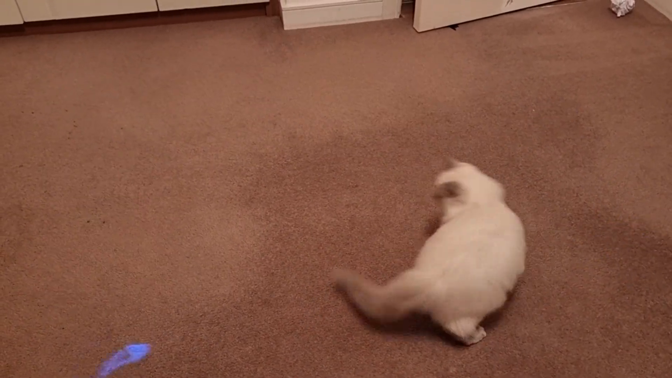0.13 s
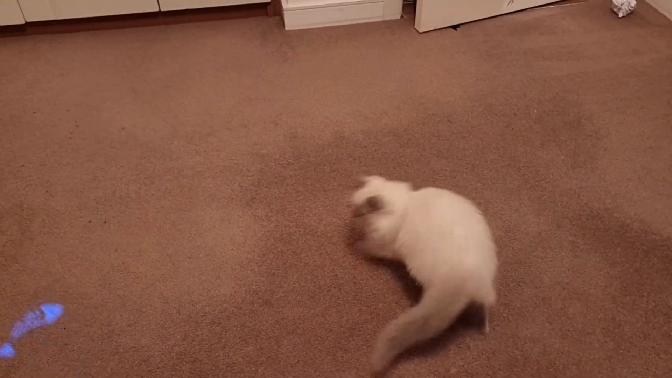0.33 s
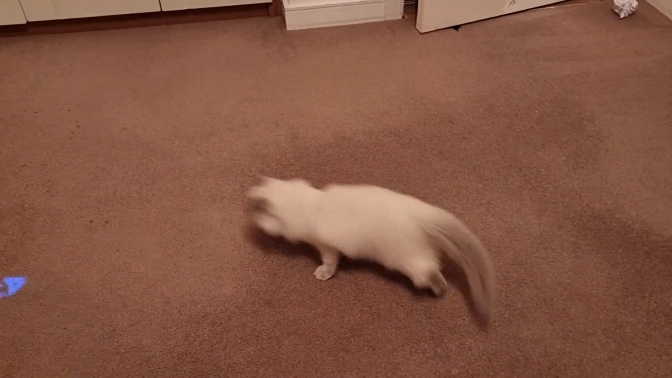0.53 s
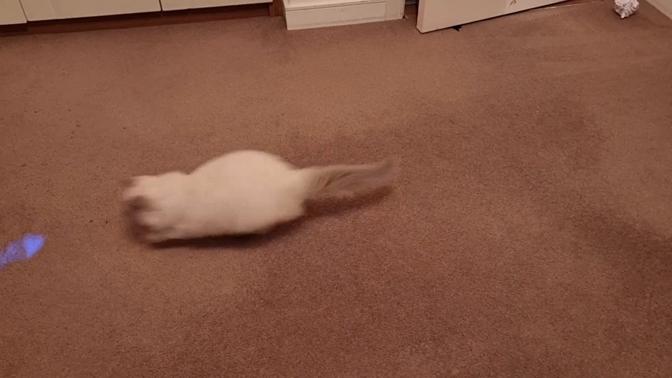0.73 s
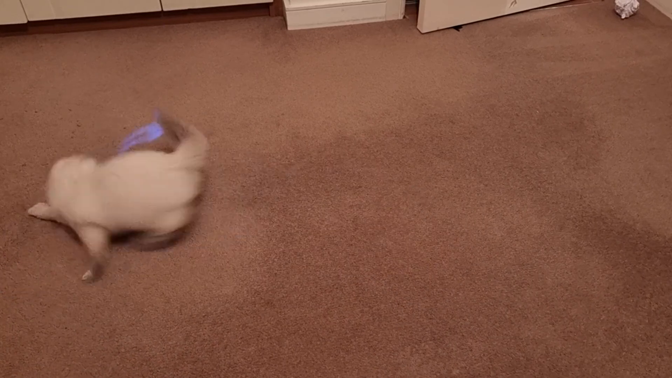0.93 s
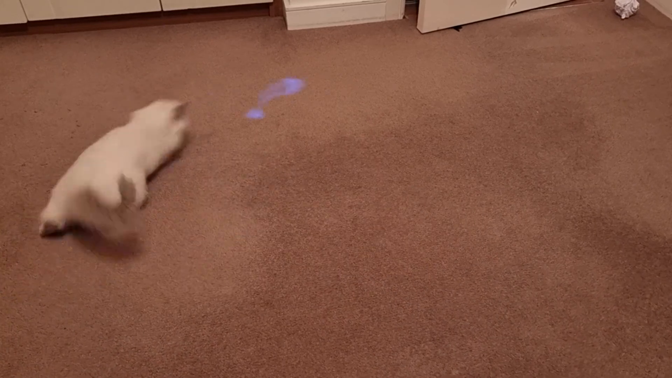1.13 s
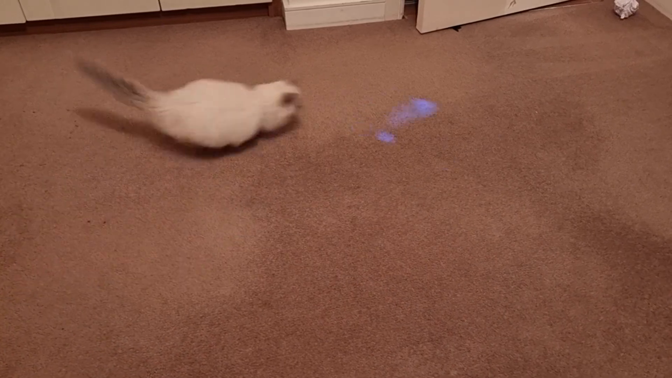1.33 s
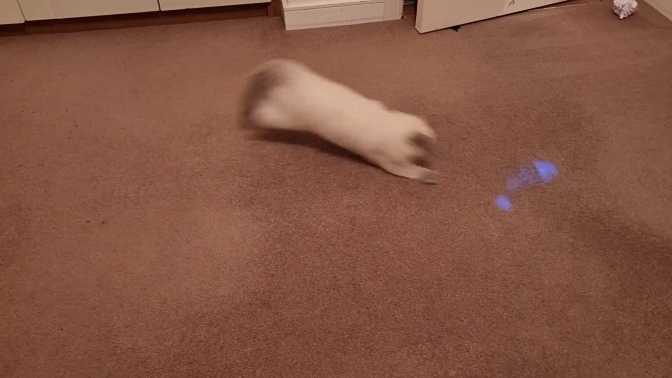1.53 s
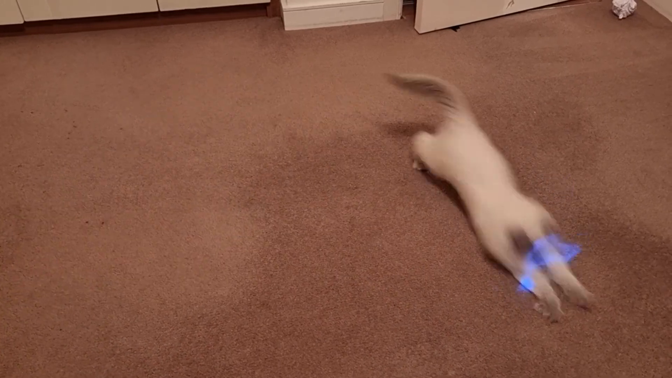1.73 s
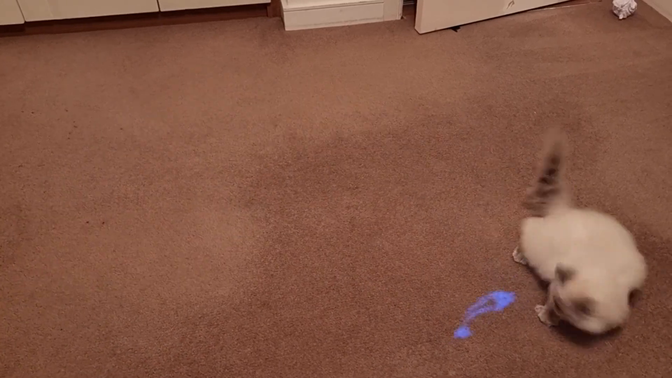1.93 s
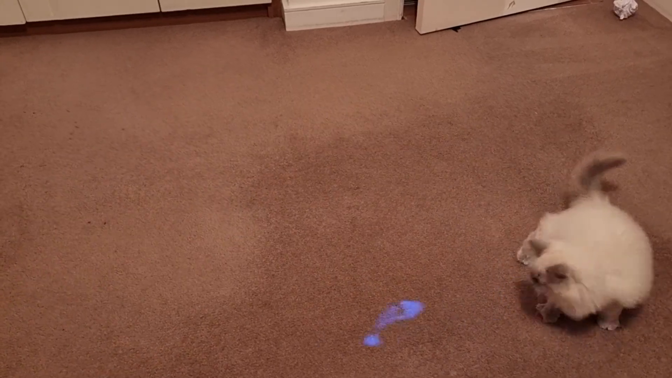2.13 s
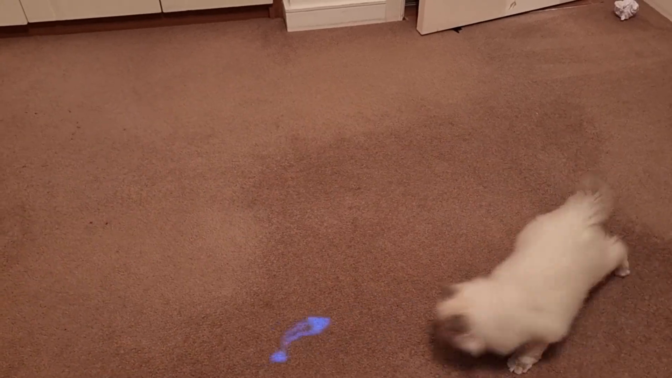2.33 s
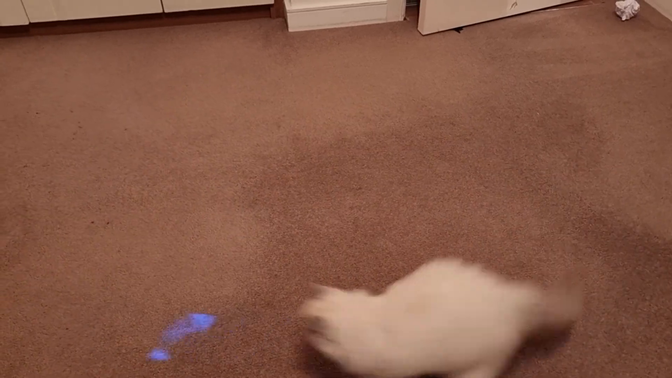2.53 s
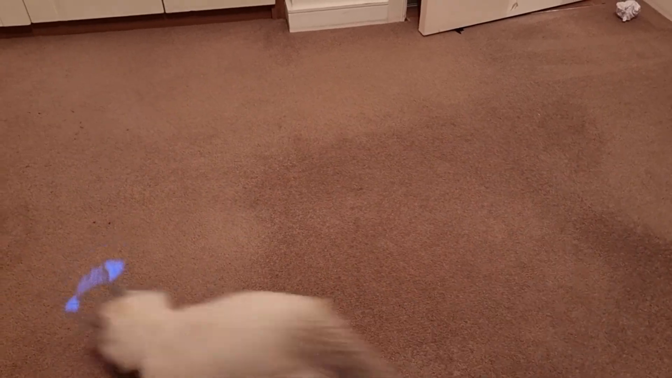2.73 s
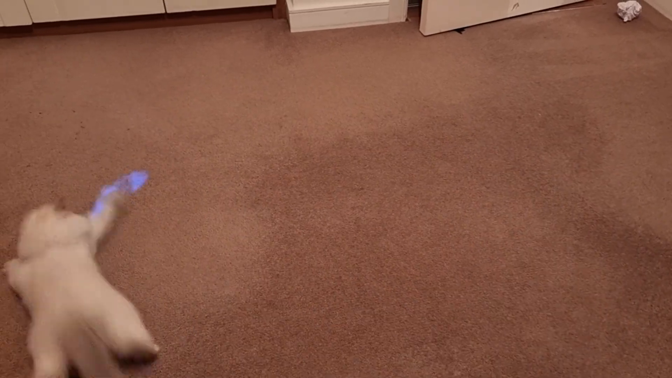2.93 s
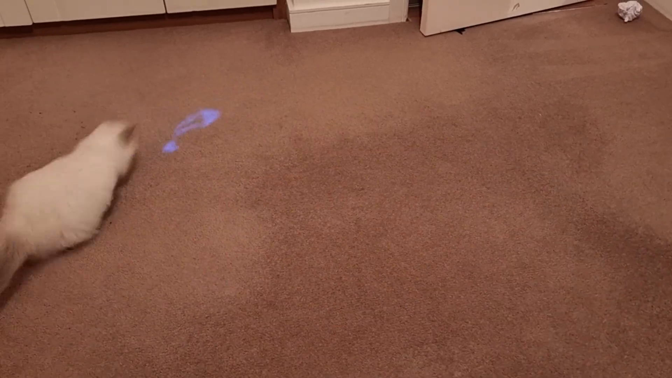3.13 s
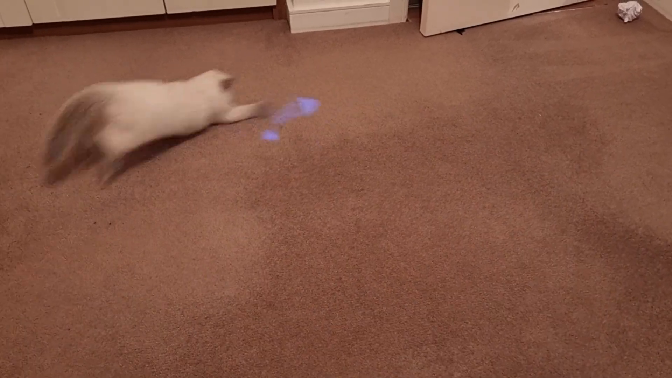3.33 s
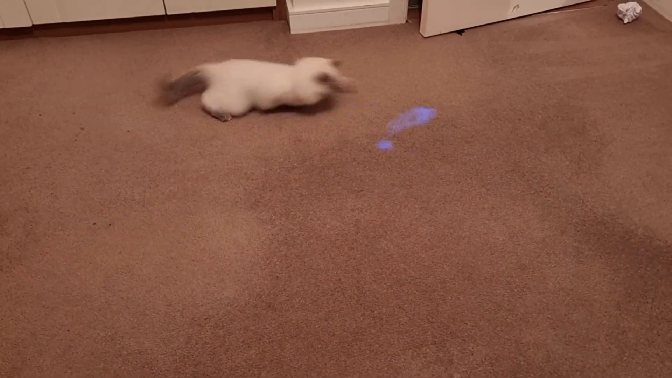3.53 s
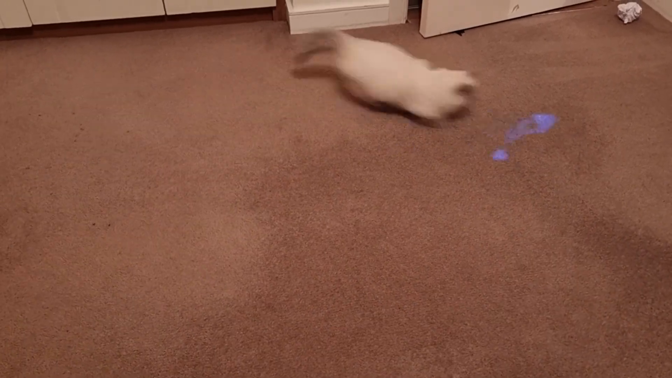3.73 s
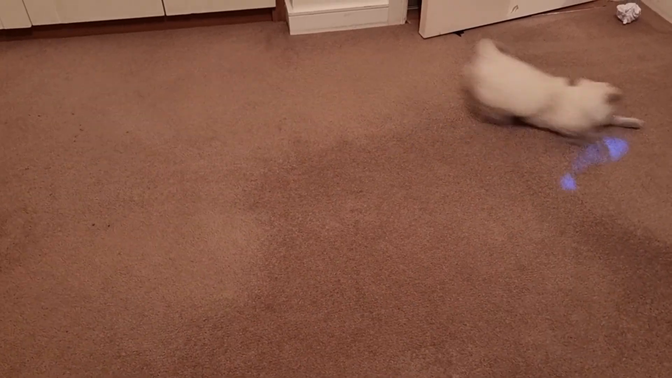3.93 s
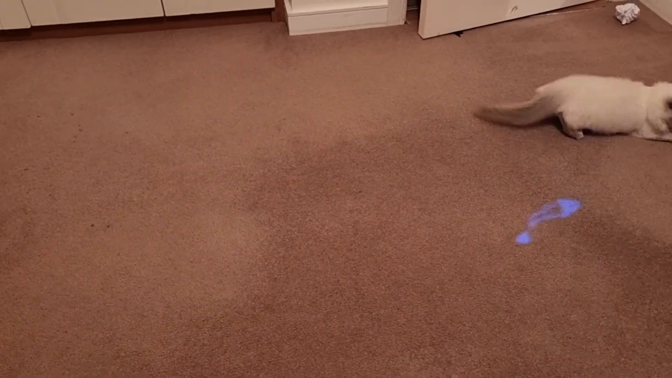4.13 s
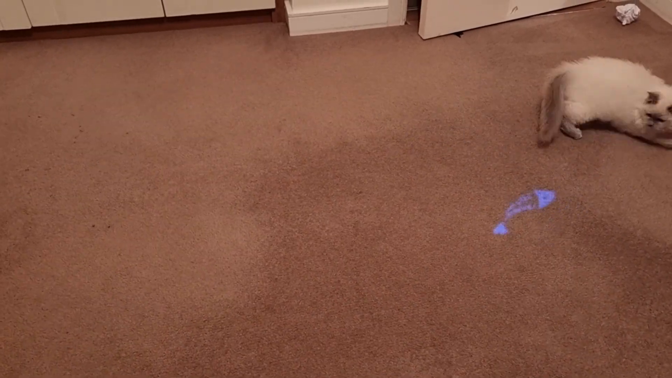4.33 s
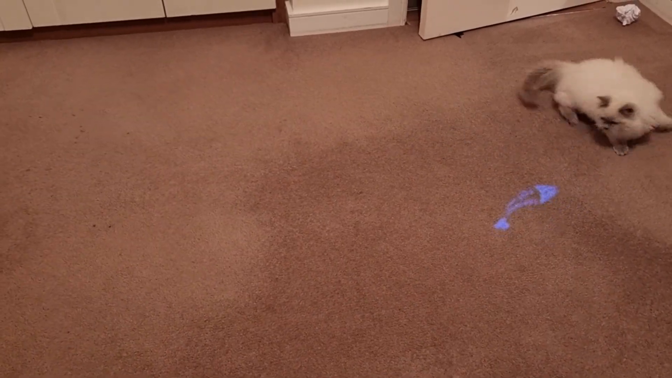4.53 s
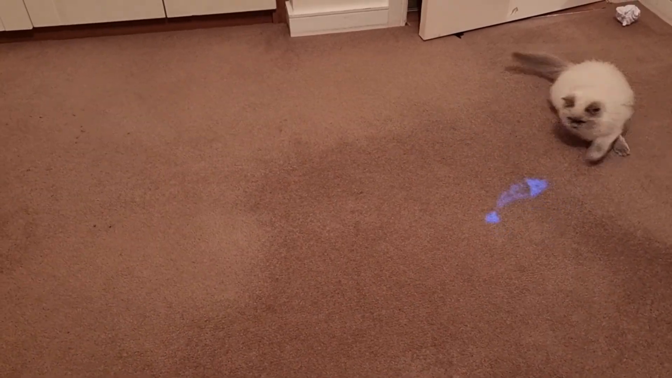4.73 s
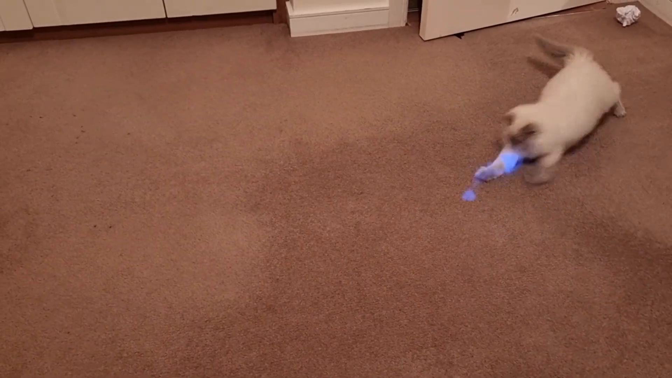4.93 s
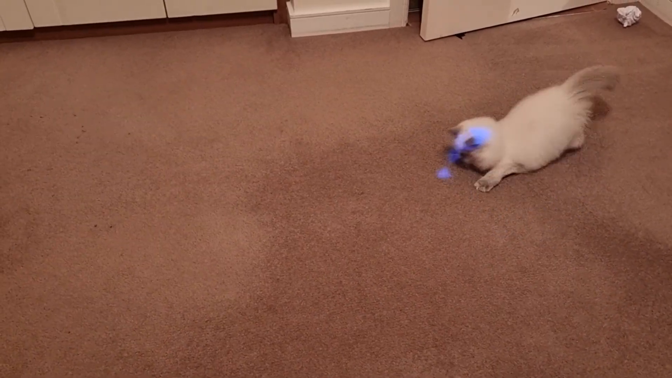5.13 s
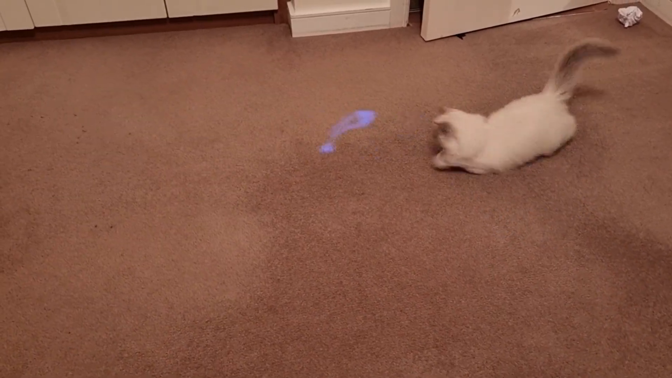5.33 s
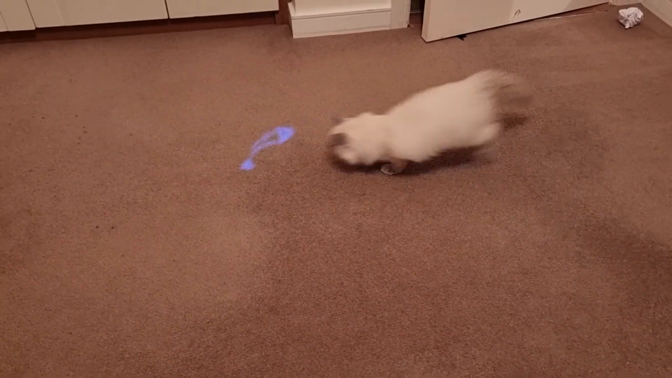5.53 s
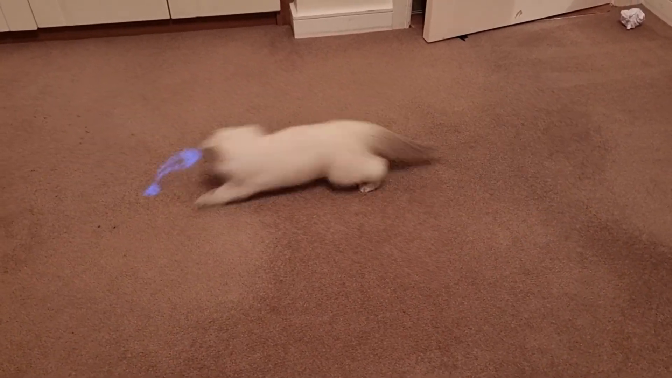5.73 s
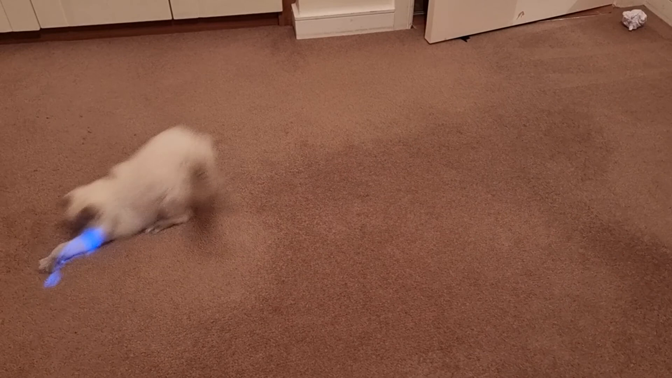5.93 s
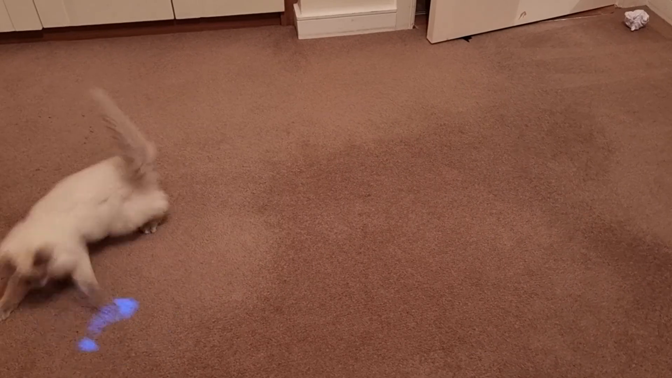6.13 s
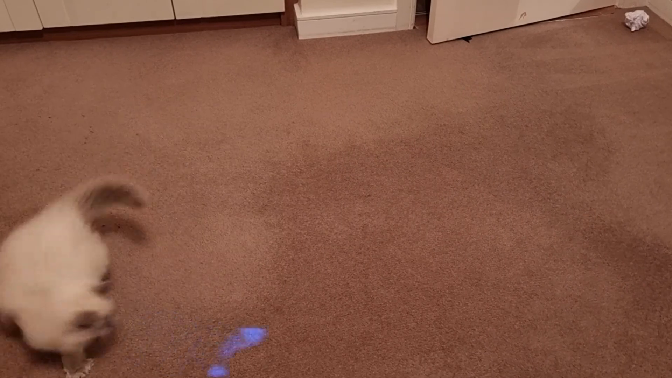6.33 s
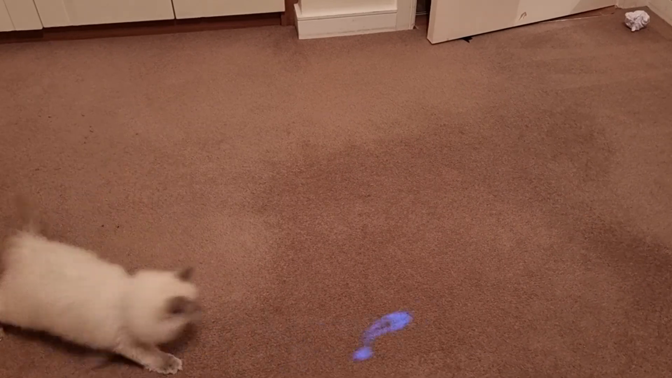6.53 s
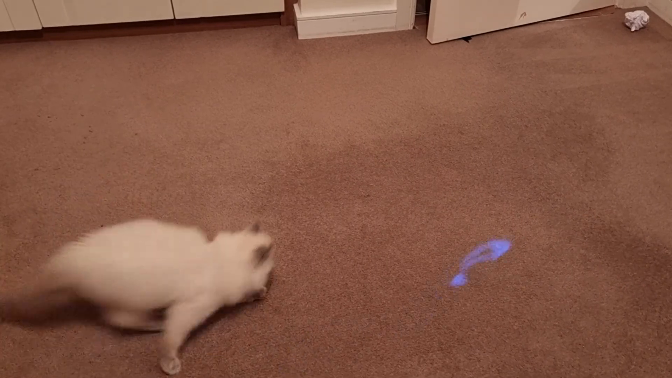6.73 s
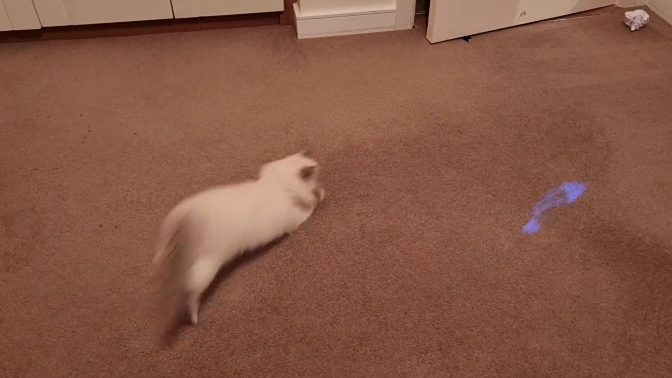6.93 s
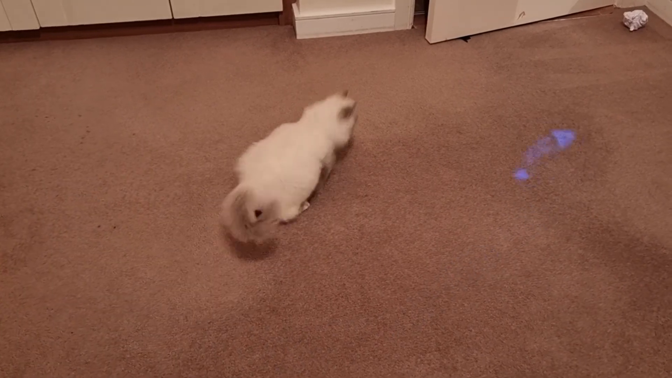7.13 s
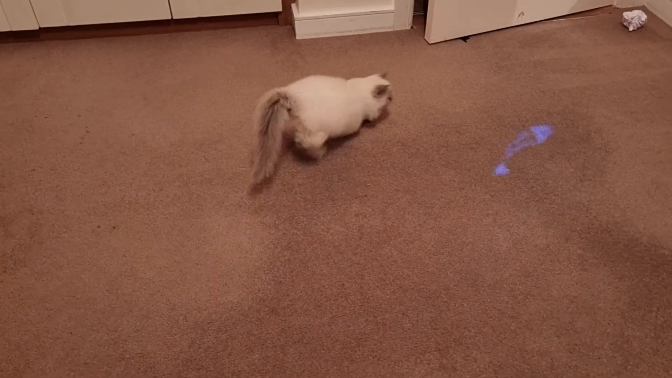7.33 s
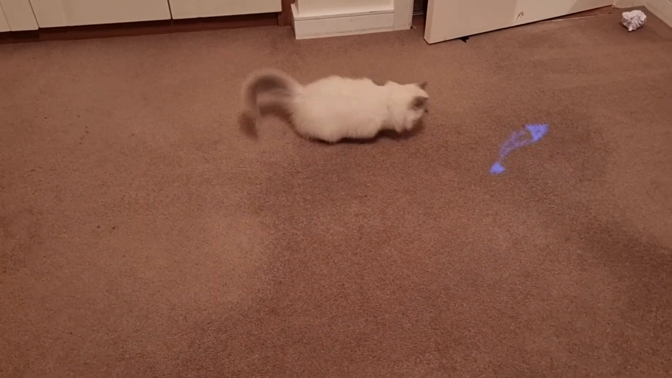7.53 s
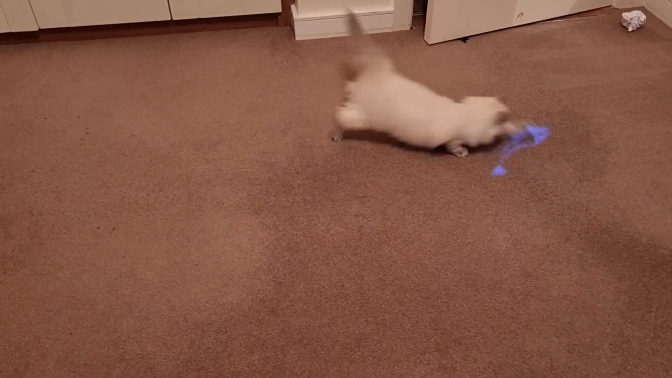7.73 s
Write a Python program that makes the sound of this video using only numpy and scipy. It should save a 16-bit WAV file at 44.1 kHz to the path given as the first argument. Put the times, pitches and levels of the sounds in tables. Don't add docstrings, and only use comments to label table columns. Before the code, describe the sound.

Muffled, rapid paw thuds boom in the boards under carpet, with small claw snags and brushing fur, in a quiet humming room.

```python
import sys
import numpy as np
from scipy import signal
from scipy.fft import rfft, irfft, next_fast_len
from scipy.io import wavfile
from scipy.ndimage import uniform_filter1d

SR = 44100
rng = np.random.default_rng(int(sys.argv[2]) if len(sys.argv) > 2 else 0)


def volts(x):
    e = np.asarray(x, float) / 20
    return 10 ** e


def wrap_up_sound(samples):
    columns = np.atleast_2d(samples).T
    tamed = np.clip(columns, -1, 1)
    steps = np.round(tamed * 32767).astype(np.int16)
    wavfile.write(sys.argv[1], SR, steps)


N = 347067
TIME = np.arange(N) / SR

# time in seconds, peak in dB, boom
# pitch in Hz, knock in dB over the boom, tail in dB (looser boards ring more).
PAW_LANDINGS = [(0.174, -48, 236, -14.5, 1.5), (0.403, -53, 272, -45, 0.5), (0.472, -52, 320, -16, -6.5),
                (0.587, -52, 238, -6.5, -0.5), (0.711, -55, 376, -7, 5), (0.751, -53, 236.6, -18, 5),
                (0.792, -45.5, 437, -4.5, -8), (0.821, -41, 310, -4, -3), (0.837, -47, 416, -1.5, 5),
                (0.865, -45.5, 370, -4.5, -2), (0.8706, -30, 381, -15.5, 1.5), (0.959, -45.5, 394, -7, -1),
                (0.9953, -34, 307, -26, -3.5), (1.02, -36.5, 340, -28.5, 0.5), (1.047, -46.5, 337, -9, 2),
                (1.065, -39.5, 295, -10, -5), (1.161, -50.5, 330, -13, 3), (1.197, -46.5, 340, -9, -9),
                (1.226, -41.5, 294, -23, -2), (1.3, -49, 300, -3, 5), (1.358, -42, 304, -11, -10),
                (1.369, -41, 322, -6.5, -0.5), (1.384, -51, 330, -6, -1), (1.464, -53, 300, -5.5, 9.5),
                (1.553, -50, 224, -10, -3.5), (1.608, -54.5, 430, -7.5, -3), (1.635, -53.5, 395, -16, 3),
                (1.647, -45.5, 330, -11.5, -0.5), (1.686, -50, 295, -23, -13), (1.7202, -51, 297, -1, -5),
                (1.728, -32.5, 347, -9, 0.5), (1.742, -39, 383, -30, -6), (1.837, -45, 350, -7.5, 3),
                (1.851, -47.5, 402, -12.5, 0.5), (1.9, -53.5, 372, -9, 4.5), (2.263, -36.5, 308, -16.5, 2),
                (2.442, -60, 286, -26, 0.5), (2.536, -54, 249, -15, 1),
                (2.708, -38, 262, -23, 1), (2.757, -50.5, 282, -25, 2.5), (2.803, -43.5, 302, -9, -5.5),
                  (2.827, -43.5, 317, -20.5, 1.5), (2.862, -35, 282, -10, -6), (2.887, -42.5, 280, -16, 7),
                  (2.907, -51.5, 290, -20, -3), (2.923, -38.5, 303, -17, -4), (2.973, -30, 368, -15, 0.5),
                  (2.995, -41, 380, -12, 0), (3.082, -45, 322, -19, -1.5), (3.12, -40.5, 315, -10, -2.5),
                  (3.171, -40, 400, -8.5, -2), (3.257, -44.5, 260, -20, -4), (3.298, -49.5, 310, -16, -3),
                  (3.361, -54, 310, -8, 6), (3.42, -48.5, 332, -22, 5), (3.466, -44, 380, -13.5, 1),
                  (3.48, -46, 310, -13, 1), (3.525, -52, 320, -6, 0), (3.602, -41.5, 200, -12, -3.5),
                  (3.635, -37.5, 233, -28, 3.5), (3.65, -43.5, 256, -12.5, -2), (3.67, -51.5, 260, -17, 3),
                  (3.745, -41.5, 285, -8.5, -1), (3.769, -51.5, 263, -8, 9.5), (3.786, -49, 242, -15, -8),
                  (3.806, -36, 211, -20, -4), (3.828, -41, 282, -19, -8), (3.839, -45.5, 284, -23, -4),
                  (3.879, -29, 326, -11, 0.5), (3.909, -39.5, 286, -8, 1.5), (3.942, -48, 304, -11, -2),
                  (3.96, -48.5, 260, -7, -7), (3.979, -44, 272, -4.5, 3.5), (4.004, -42.5, 301, -7.5, 2.5),
                  (4.021, -48.5, 320, -7.5, 5),
                (4.306, -51.5, 284, -18, -1), (4.417, -64.5, 280, -24, 5), (4.812, -57.5, 227, -12, 0.5),
                   (4.924, -42, 310, -9, 2), (4.964, -54.5, 288, -17, 6.5), (5.088, -63.5, 286, -10, 6),
                   (5.105, -44, 315, -1.5, -3), (5.39, -59.5, 180, -21, -2), (5.447, -44.5, 320, -0.5, 1),
                   (5.4555, -45, 427, -13, -2), (5.538, -43.5, 273, -25, -2.5),
                   (5.563, -44.5, 247, -33, -8), (5.647, -55.5, 194, -24, -1),
                   (5.747, -49.5, 210, -10.5, -4), (5.785, -46.5, 410, -4.5, 1), (5.801, -37, 332, -4, -13),
                   (5.81, -32, 307, -18.5, -3.5), (5.845, -52, 354, -16, 3), (5.894, -41.5, 346, 0.5, 7),
                   (5.902, -23, 368, -14.5, -3.5), (5.918, -36, 422, -2, -6), (5.935, -37.5, 347, -7, 3),
                   (5.962, -31, 250, -10.5, -1),
                (6.104, -43.5, 381, -3.5, 1), (6.121, -40.5, 282, -22, -6), (6.207, -39, 292, -34, -9),
                 (6.214, -36.5, 285, -25, -3.5), (6.35, -60, 383, -9, 10), (6.366, -37.5, 315, -32, -3),
                 (6.492, -38.5, 304, -20.5, -0.5), (6.538, -41.5, 271, -19, -6),
                 (6.717, -53.5, 280, -3, 1.5), (6.755, -55, 300, -24, -1), (6.802, -44, 218, -18, 0.5),
                 (6.847, -44.5, 335, -7, -0.5), (6.858, -45, 362, -21, 1), (6.9235, -41.5, 260, -5.5, 3),
                 (6.935, -44.5, 412, -19, -4.5), (7.09, -46.5, 243, -17, -2.5), (7.132, -63, 260, -16, 3),
                 (7.197, -40, 280, -14.5, -2), (7.221, -40, 237, -28, -3), (7.55, -45, 372, -2.5, -18),
                 (7.569, -49, 318, -31, 2), (7.655, -48, 344, -10, -0.5), (7.751, -41.5, 319, -11.5, 1.5),
                 (7.774, -53, 300, -16, -2), (7.846, -53.5, 343, -1.5, 15)]
# pitch in Hz, level in dB.
BOARDS = [(60, -22.5), (120, 2.5), (170, 2.5), (400, 5), (500, 10), (640, 0.5), (820, 12.5), (1300, 0.5)]
# time in seconds, peak in dB.
BODY_DROPS = [(1.228, -52), (1.646, -61), (1.849, -54.5), (2.707, -54.5), (2.827, -52), (2.89, -50.5),
              (3.467, -49.5), (3.603, -47), (3.828, -48), (4.926, -52.5), (5.104, -52.5), (5.452, -48),
              (5.748, -54), (6.491, -47), (6.539, -68), (7.198, -52), (7.655, -60), (7.751, -63)]
# time in seconds, peak in dB, boom pitch in Hz.
TIPTOES = [
    (0.7875, -45, 400),
    (0.9905, -39, 310),
    (1.336, -56, 290),
    (1.2345, -42, 308),
]
# time in seconds, peak in dB, pluck pitch in Hz, bright part in dB over the
CLAW_PLUCKS = [(0.7122, -53, 2300, -37), (0.7905, -47, 1600, -34), (0.8371, -41, 1040, -37),
               (0.8676, -53, 1100, -15), (0.9587, -55, 1180, -25), (1.0664, -35, 2676, -16),
               (1.1981, -41, 2060, -21), (1.239, -51, 1090, -25.0), (1.3012, -53, 2700, -5),
               (1.303, -39.5, 2600, -39), (1.372, -42, 1360, -24), (1.4422, -37, 2285, -43),
               (1.6047, -49, 2320, -22), (1.6428, -49, 1660, -15), (1.7295, -48, 1040, -16.5),
               (1.8442, -61, 1090, -17), (2.7143, -53.5, 1730, -18), (2.7695, -43.5, 2060, -25),
               (2.828, -45, 1880, -14), (2.93, -54, 3000, -15), (2.9777, -70, 1220, -21.0),
               (3.0824, -67, 1110, -19.5), (3.109, -63, 3500, -12), (3.173, -42.5, 2550, -23),
               (3.344, -54, 2170, -27.0), (3.367, -49, 2140, -23.5), (3.4225, -49.5, 1390, -24),
               (3.4934, -47, 1220, -23),
               (3.5257, -57, 2490, -11), (3.602, -54, 1300, -27), (3.657, -52, 3020, -27),
              (3.735, -45, 2680, -30), (3.8132, -53, 1260, -19.5), (3.825, -47, 2580, -10.5),
              (3.884, -51, 1560, -26), (3.903, -42.5, 3220, -31), (4.2997, -50.5, 1330, -6),
              (4.9197, -52, 2510, -21), (5.1072, -48, 3580, -7.5), (5.1831, -52, 2900, -23.5),
              (5.4515, -44.5, 1920, -13.5), (5.4565, -42, 2220, -20), (5.769, -62, 1770, -14.0),
              (5.7846, -48, 1950, -16), (5.8057, -39, 2070, -15.5), (5.904, -59, 1230, -14),
              (5.9328, -44, 2530, -9), (5.9531, -38, 1400, -38), (6.0855, -63, 2170, -16),
              (6.1065, -42, 1510, -13), (6.3487, -47, 3120, -11.5), (6.5375, -50.5, 1050, -12),
              (6.8478, -40.5, 2714, -17.5), (6.7231, -56, 1510, -14), (6.9331, -64, 1290, -16),
              (7.2133, -62, 2260, -21.5), (7.5505, -52, 2600, -22), (7.7554, -69, 1490, -22)]
# time in seconds, peak in dB, pitch in Hz.
CLAW_TAPS = [
    (0.7132, -41, 1280),
    (0.9604, -42, 1200),
    (1.3018, -37, 1300),
    (3.1735, -36.5, 1200),
    (4.3012, -62, 2000),
    (5.1073, -43.5, 980),
    (5.4471, -34.5, 890),
    (6.3488, -50, 2200),
    (6.8478, -34.5, 1300),
    (7.5497, -54, 1500),
]
# time in seconds, peak in dB.
FIBRE_SNAPS = [
    (5.9032, -53),
    (5.936, -50),
    (7.4904, -66),
]
# start in seconds, length in seconds, level in dB, bright part in
# dB over it, tilt in dB from coarse to fine fibres.
BRUSH_STROKES = [(0.715, 0.013, -57, -46, -5), (0.793, 0.018, -69, -38, -11), (0.83, 0.02, -55, -27, -7.5),
                 (0.868, 0.02, -59, -21, -2), (0.951, 0.015, -59, -18, -5), (1, 0.025, -66, -24, 3),
                 (1.061, 0.061, -58.5, -15, -2.5), (1.189, 0.014, -56.5, -30, 2),
                 (1.249, 0.019, -65, -25, -5.5), (1.302, 0.021, -49.5, -17.5, 1.5),
                 (1.38, 0.013, -61, -16, 4), (1.444, 0.085, -63, -33.5, 1.5),
                 (1.61, 0.068, -64.5, -27, -0.5), (1.731, 0.041, -54.5, -11.5, -1),
                 (1.838, 0.094, -62.5, -16, 1), (2.721, 0.02, -65, -9, -4), (2.77, 0.014, -64, -24, 4),
                 (2.806, 0.02, -60.5, -14, -4), (2.855, 0.055, -57.5, -18.5, 0),
                 (2.938, 0.015, -70, -13, 2), (2.975, 0.039, -62, -20, 1), (3.087, 0.043, -61.5, -19, 1),
                 (3.172, 0.014, -66.5, -39, -16), (3.287, 0.019, -59, -28, -2), (3.355, 0.071, -60, -28, 0),
                 (3.424, 0.034, -62, -24, 0), (3.498, 0.064, -70, -24, 1),
                 (3.61, 0.033, -65, -31, 1), (3.657, 0.021, -63.5, -26, 8.5),
                (3.738, 0.021, -53.5, -20.5, -1), (3.815, 0.045, -55.5, -20, -0.5),
                (3.889, 0.051, -55.5, -17.5, 2), (3.957, 0.039, -64, -18, -2),
                (4.005, 0.047, -57, -22, 1.5), (4.032, 0.039, -64, -10, -5), (4.301, 0.021, -60, -8.5, 1),
                (4.92, 0.093, -70, -16, 0.5), (5.09, 0.03, -64.5, -9, 5.5), (5.187, 0.01, -66, -25, 4),
                (5.451, 0.007, -51, -21, -6.5), (5.768, 0.029, -60.5, -16, 2),
                (5.797, 0.034, -57.5, -14, 2.5), (5.904, 0.025, -55, -9, 3.5),
                (5.933, 0.034, -50.5, -12.5, 3.5), (6.075, 0.015, -63.5, -16, -2),
                (6.106, 0.019, -58, -20.5, 4), (6.207, 0.02, -64, -15, -2.5),
                (6.348, 0.023, -55.5, -23, -1), (6.532, 0.017, -65, -15, 1), (6.817, 0.026, -64.5, -13, 2),
                (6.845, 0.019, -56, -28, -4), (6.928, 0.02, -70.5, -14, 7.5),
                (7.206, 0.096, -66.5, -17, 4.5), (7.54, 0.02, -69.5, -25, 6),
                (7.753, 0.051, -68.5, -28, 5.5), (7.856, 0.022, -71, -28, 8)]
# pitch in Hz, level in dB per Hz.
PILE = [(400, 2.5), (700, -2), (1050, 0), (1520, -7), (2000, -6.5), (2700, -7.5), (4200, -16),
        (6000, -33.5)]
# pitch in Hz, level in dB rms.
HUM = [(100.1, -63), (200.2, -86.5)]
# pitch in Hz, level in dB per Hz.
AIR = [(25, -19.5), (60, -0.5), (130, 3), (300, -1), (550, -11), (1050, -12.5), (1700, -13.5),
       (3600, -12.5), (4600, -24), (7800, -26), (9600, -37), (10500, -39), (12000, -34.5), (15700, -38.5)]
# pitch in Hz, width in Hz, change in dB.
HISS_PEAKS = [(7000, 830, 3.5), (9000, 240, 18), (1350, 170, -7.5), (9000, 120, -6.5), (6680, 35, 11)]
# pitch in Hz, likeness from 0 to 1.
LIKENESS = [(60, 0.5), (300, 0.9), (640, 0.27), (1300, 0.12), (9000, 0)]
# pitch in Hz, left minus right in dB.
LEAN = [(60, -1.5), (110, 0.5), (200, -1.5), (380, -1), (700, -1.5), (1290, -2), (2380, -6), (4400, -1),
        (8120, 1), (15000, -6.5)]


def paws(size=8192):
    out = np.zeros((2, N))
    body = np.roll(push(359, 0.87, 4.0, size), 170)
    sag = push(174, 1.07, 3.5, size)
    knock = push(549.3, 0.72, 9.5, size) + 0.41 * push(932.4, 0.73, 2.1, size)
    for s, db, hz, knock_db, tail_db in PAW_LANDINGS:
        harder_db = db + 45
        ring_s = np.clip(0.185 - 0.0025 * harder_db, 0.05, 0.3)
        sag_db = -17.5 - 0.69 * harder_db
        boom = resound(push(hz, 1.55, 3.48, size) + 0.35 * body, ring_s, tail_db - 26, 0.0037)
        low = volts(sag_db + 4) * resound(sag, 0.94 * ring_s, tail_db - 27.5, 0.0015)
        high = volts(knock_db + 13.5) * resound(knock, 0.93 * ring_s, -24.5, 0.0042, direct=0.32)
        add(out, s - 0.0006, volts(db - 3) * (boom + low + high))
    return colour(out, BOARDS)


def drops(size=8192):
    out = np.zeros((2, N))
    sag = push(168, 1.8, 5.2, size)
    for s, db in BODY_DROPS:
        add(out, s, volts(db) * resound(sag, 0.26, -28.5, 0.0037))
    return colour(out, BOARDS)


def tiptoes(size=4096):
    out = np.zeros((2, N))
    for s, db, hz in TIPTOES:
        add(out, s, volts(db) * resound(push(hz, 1.2, 4.2, size), 0.09, -24, 0.004))
    return out


def claws(size=6144):
    out = np.zeros((2, N))
    t = np.arange(size) / SR
    bins_hz = np.arange(size // 2 + 1) * SR / size
    for s, db, hz, bright_db in CLAW_PLUCKS:
        bounce_s = max(round(hz * 0.0014), 1) / hz
        flutter = 1 / (1 - 0.52 * np.exp(-2j * np.pi * bins_hz * bounce_s))
        tear = np.roll(volts(-13) * crackle(size, 0.05, 3) * np.exp(-t / 0.009), 90)
        tear[:130] += volts(-18) * crackle(130, 0.1, 3)
        tear[90 + rng.integers(20)] += 1.3
        tear = tear / np.sqrt(np.sum(tear ** 2))
        snap = volts(bright_db + 21) * push(3170, 0.091, 0.36, size)
        pluck = push(hz, 0.84, 3.1, size) + 0.31 * push(3150, 0.78, 2.2, size)
        sound = resound(irfft(rfft(tear) * rfft(pluck) * flutter, size), 0.15, -28.5, 0.004)
        sound += resound(irfft(rfft(tear) * rfft(snap), size), 0.16, -33.5, 0.0035)
        lag = rng.integers(-16, 22)
        sound = np.array([np.roll(sound[0], 16), np.roll(sound[1], 16 + lag)])
        add(out, s - 0.0016, volts(db) * sound)
    return out


def taps(size=4096):
    out = np.zeros((2, N))
    for s, db, hz in CLAW_TAPS:
        add(out, s, -volts(db) * resound(push(hz, 0.31, 1.8, size), 0.081, -27.5, 0.0054))
    return out


def snaps(size=4096):
    out = np.zeros((2, N))
    for s, db in FIBRE_SNAPS:
        add(out, s, volts(db) * resound(push(12200, 1.2, 2.5, size), 0.05, -20, 0.0015))
    return out


def brush():
    bands = [(250, 500, 1200, 2600), (800, 1500, 2300, 4200), (1500, 2900, 5000, 8000)]
    parts = []
    for band in bands:
        parts.append(colour(fibres(list(zip(band, (-20, 0, 0, -20))), 5), PILE))
    parts = np.array(parts)
    parts = parts / np.sqrt(np.mean(parts.sum(axis=0) ** 2))
    bright_colour = [(2500, -11.5), (3500, 1), (4800, -2), (8000, -0.5), (10500, -10.5), (15000, -9.5)]
    bright = set_rms(fibres(bright_colour, 5.9), 0)
    press, sheen = np.zeros((3, N)), np.zeros(N)
    for s, length, db, bright_db, tilt_db in BRUSH_STROKES:
        length = max(length, 0.002)
        at = [s - 0.012 - 0.18 * length, s, s + length, s + length + 0.087]
        span = slice(int(at[0] * SR), min(int(at[-1] * SR), N))
        shape_db = np.interp(TIME[span], at, [-25, 0, -4.5, -27])
        press[:, span] += volts(db + shape_db + tilt_db * np.array([[-1], [0], [1]]))
        sheen[span] += volts(db + bright_db + 1.5 + 1.37 * shape_db)
    return np.sum(press[:, None] * parts, axis=0) + sheen * bright


def fibres(points, patchy_db):
    click = np.arange(8192) == 0
    grains = crackle(N, 0.06, 4.2) * volts(patchy_db * walk(45))
    sound = signal.fftconvolve(grains[None], resound(click, 0.12, -25, 0.003), axes=1)[:, :N]
    sound[1] = np.roll(sound[1], rng.integers(8, 24))
    return colour(sound, points)


def crackle(shape, share, scatter_db):
    hit = rng.random(shape) < share
    size_db = scatter_db * np.minimum(rng.exponential(size=shape), 3)
    return hit * rng.standard_normal(shape) * volts(size_db)


def lift_2700(x):
    return colour(x, [(2700 - 240, 0), (2700, 5), (2700 + 240, 0)])


def push(hz, cycles, soft, size):
    turn = np.arange(size // 4) / SR * hz / cycles
    swell = np.sin(2 * np.pi * turn * cycles) * (turn * np.exp(1 - turn)) ** soft
    return np.pad(swell, (0, size - len(swell)))


def resound(x, t60, wet_db, build_s, direct=1):
    t = np.arange(len(x)) / SR
    fade = np.exp(-np.log(1000) * t / t60) * (1 - np.exp(-t / build_s))
    tail = irfft(spread(rng.standard_normal((2, len(x))) * fade) * rfft(x), len(x))
    wanted = volts(wet_db) ** 2 * np.sum(fade ** 2) * np.sum(x ** 2)
    share = wanted / np.mean(np.sum(tail ** 2, axis=1))
    return direct * x + np.sqrt(share) * tail


def spread(x):
    n = x.shape[-1]
    like = np.clip(curve(LIKENESS, np.arange(n // 2 + 1) * SR / n), 0, 1)
    mid, side = rfft(x) * np.sqrt([1 + like, 1 - like])
    return np.array([mid + side, mid - side]) / np.sqrt(2)


def curve(points, hz):
    f, value = np.transpose(points)
    return np.interp(np.log(hz + 1), np.log(f), value)


def colour(x, points):
    n = next_fast_len(x.shape[-1])
    gain = volts(curve(points, np.arange(n // 2 + 1) * SR / n))
    return irfft(rfft(x, n) * gain, n)[..., :x.shape[-1]]


def set_rms(x, db):
    return x * volts(db) / np.sqrt(np.mean(x ** 2))


def walk(rate):
    k = int(SR / rate)
    steps = np.repeat(rng.standard_normal(N // k + 1), k)
    return 0.6 * uniform_filter1d(uniform_filter1d(steps, k), k)[:N]


def add(out, s, x):
    i = int(s * SR)
    out[:, i:i + x.shape[1]] += x[:, :N - i]


def hum():
    tone = np.zeros(N)
    for hz, db in HUM:
        tone += volts(db) * np.sqrt(2) * np.sin(2 * np.pi * hz * TIME + 0.047 * walk(6.1))
    return tone * volts(0.5 * walk(2.7))


def air():
    n = next_fast_len(N)
    hz = np.arange(n // 2 + 1) * SR / n
    ports_db = sum(db * np.exp(-((hz - f) / w) ** 2) for f, w, db in HISS_PEAKS)
    hiss = spread(rng.standard_normal((2, n))) * volts(curve(AIR, hz) + ports_db)
    return set_rms(irfft(hiss, n)[:, :N], -69.5) * volts(2.2 * walk(4.5))


def scene():
    floor = paws() + drops() + tiptoes()
    carpet = lift_2700(claws() + brush()) + taps() + snaps()
    return floor + carpet + hum() + air()


def top_cut(x):
    return signal.sosfilt(signal.butter(12, 15710, fs=SR, output="sos"), x)


def record(dry):
    edge = 4096
    after = next_fast_len(N + 2 * edge) - N - edge
    wide = np.pad(dry, ((0, 0), (edge, after)), mode="reflect")
    left = colour(wide[0], [(hz, db / 2) for hz, db in LEAN])
    right = colour(wide[1], [(hz, -db / 2) for hz, db in LEAN])
    cut = colour(np.array([left, right]), [(15660, 0), (15780, -50)])
    close = np.clip((N / SR - TIME) / 0.004, 0, 1)
    return top_cut(close * cut[:, edge:edge + N])


dry = scene()
out = record(dry)
wrap_up_sound(out)
```